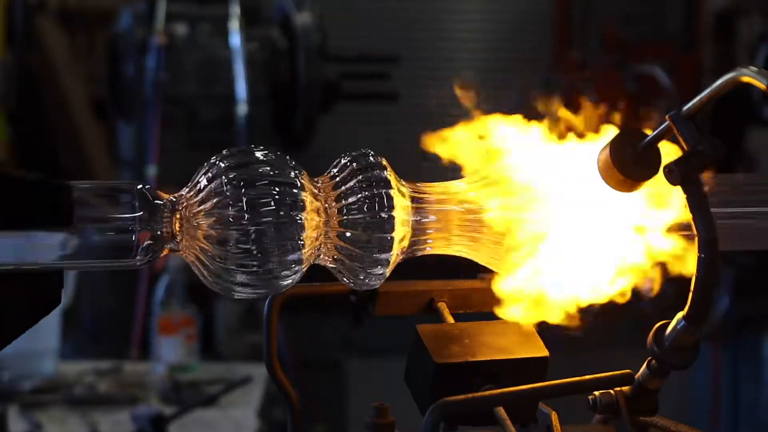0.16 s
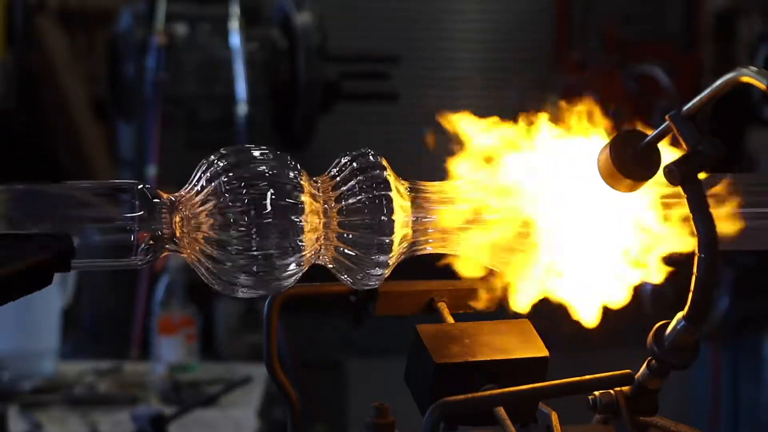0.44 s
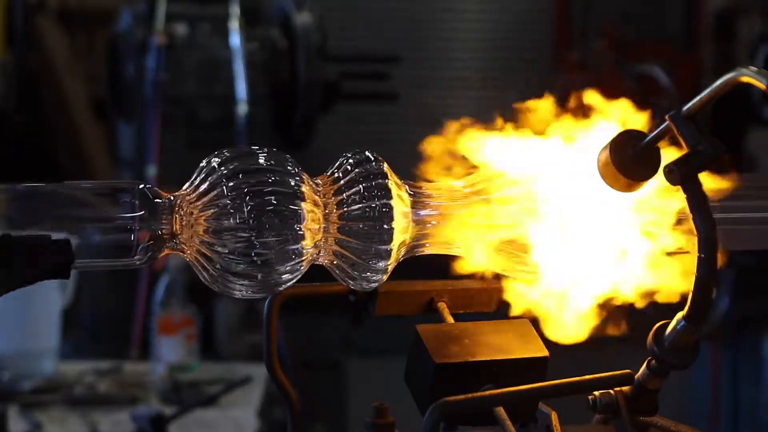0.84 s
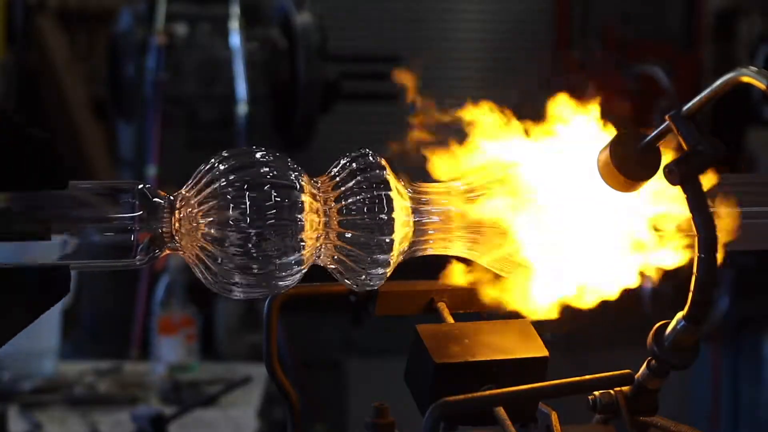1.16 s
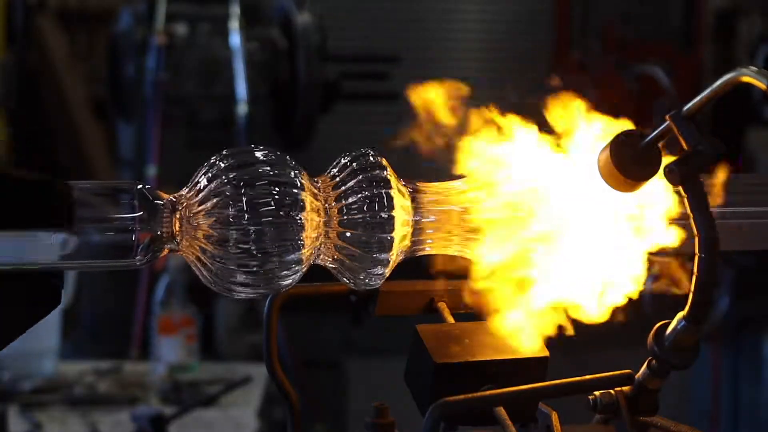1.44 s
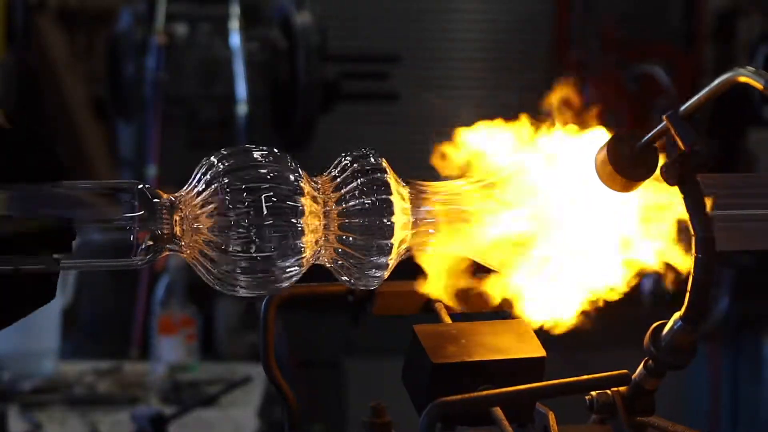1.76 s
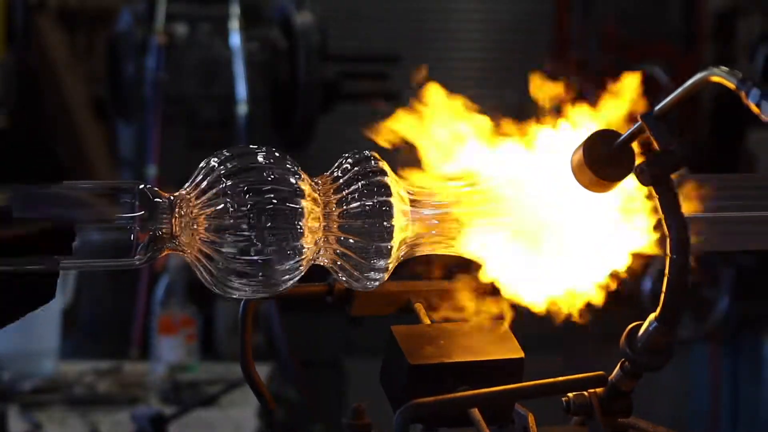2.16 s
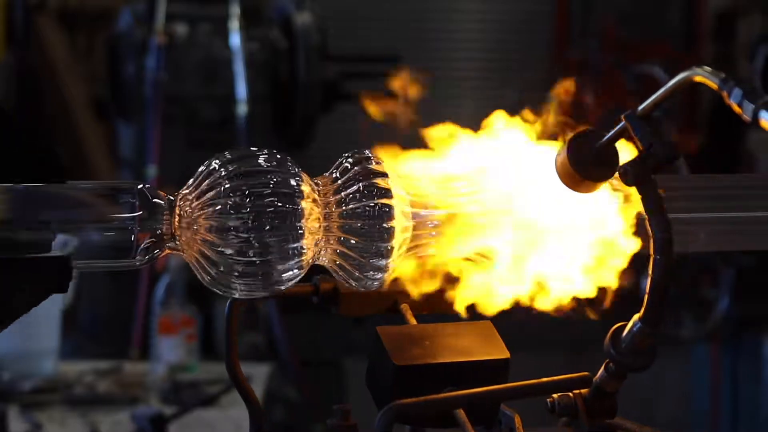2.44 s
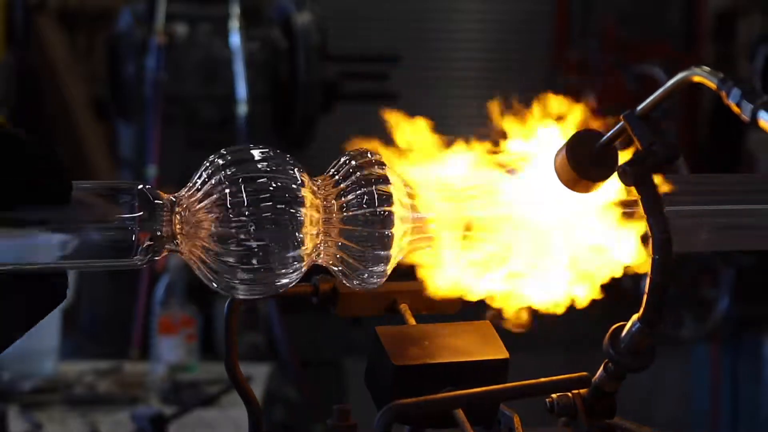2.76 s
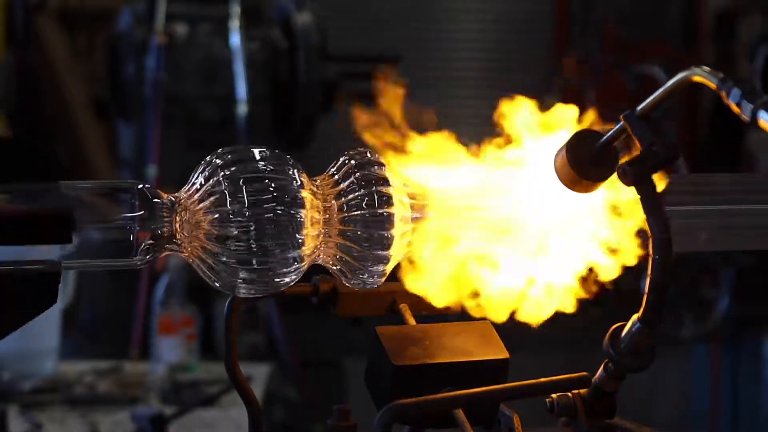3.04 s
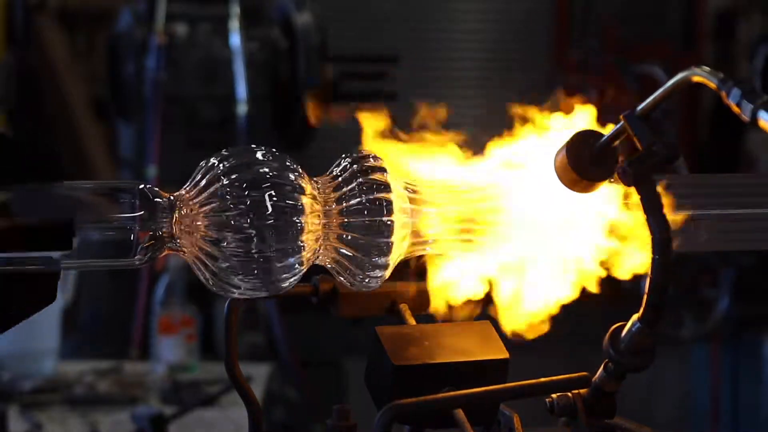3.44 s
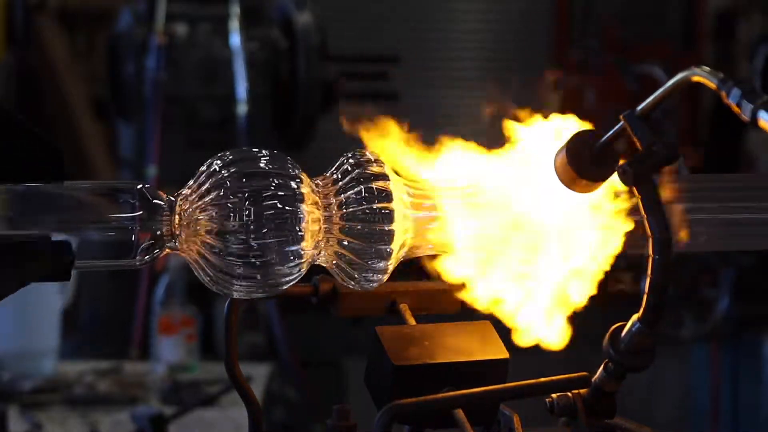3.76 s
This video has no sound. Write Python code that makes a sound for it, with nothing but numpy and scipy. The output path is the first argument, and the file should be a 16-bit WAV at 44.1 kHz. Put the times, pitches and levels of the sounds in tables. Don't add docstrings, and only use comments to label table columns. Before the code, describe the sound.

From 0 to about 3.9 seconds a gas torch roars loudly and almost evenly, already running and never stopping. Strong bright hiss and fine sizzle dominate a softer, slightly fluttering rumble. A piercing thin whistle near 10.5 kHz quivers in short uneven swells, strongest around 0.2, 2.1 and 2.4 seconds, choking briefly between. The hiss dulls slightly near 2.9 seconds. Close, centred, short workshop echo.

```python
import sys
import numpy as np
from scipy import signal
from scipy.fft import rfft, irfft, next_fast_len
from scipy.io import wavfile
from scipy.ndimage import uniform_filter1d

SR = 44100
rng = np.random.default_rng(int(sys.argv[2]) if len(sys.argv) > 2 else 0)


def ratio(d):
    e = np.asarray(d, float) / 20
    return 10 ** e


def generate_wav(sig):
    pcm = np.round(np.clip(np.atleast_2d(sig).T, -1, 1) * 32767).astype(np.int16)
    wavfile.write(sys.argv[1], SR, pcm)


N = 171549
T = np.arange(next_fast_len(N, True)) / SR
HZ = np.maximum(np.fft.rfftfreq(len(T), 1 / SR), 1)
PATCH_S = 0.04


def noise():
    return rfft(rng.standard_normal(len(T)))


def wave(spectrum):
    return irfft(spectrum, len(T))


def level(x, db):
    return x * ratio(db) / np.sqrt(np.mean(x ** 2))


def walk(rate):
    hold = int(SR / rate)
    steps = np.repeat(rng.standard_normal(400), hold)[:len(T)]
    slewed = uniform_filter1d(uniform_filter1d(steps, hold), hold)
    return (slewed - slewed.mean()) / slewed.std()


def turbulence(points, billow_db, flicker_db, billow_hz, edge_db):
    hz, db = np.array(points).T
    octaves = np.log2(HZ)
    low, high = np.log2(hz[0]), np.log2(hz[-1])
    outside = np.maximum(low - octaves, 0) + np.maximum(octaves - high, 0)
    colour = noise() * ratio(np.interp(octaves, np.log2(hz), db) - edge_db * outside)
    billow = billow_db * walk(billow_hz)
    out = 0
    for centre in np.arange(low // 1 - 1, min(high + 1, 14.6), 0.5):
        share = np.cos(np.pi * np.clip(octaves - centre, -0.5, 0.5)) ** 2
        flicker = flicker_db * walk(billow_hz * 3)
        out = out + wave(colour * share) * ratio(billow + flicker)
    return out


def combustion():
    # [Hz, dB per Hz]
    flame_colour = [(15, -59), (25, -31), (181, 1.5), (284, -2), (381, 2), (672, -4.5), (1440, -3.5),
                    (2310, -4), (2700, -24), (3510, -26), (5940, -120)]
    return level(turbulence(flame_colour, billow_db=0.47, flicker_db=0.54, billow_hz=6, edge_db=60), -31.5)


def gas_jets():
    # [Hz, dB per Hz]
    jet_colour = [(2600, -14.5), (3600, -10), (5860, -5), (7530, -5.5), (8900, -3.5), (9300, -7.5),
                  (10300, -9.5), (11300, -15)]
    return level(turbulence(jet_colour, billow_db=0.62, flicker_db=0.41, billow_hz=5, edge_db=76), -21.5)


def nozzle_rim():
    # [Hz, dB per Hz]
    rim_colour = [(11300, 3.5), (12500, 3.5), (13400, 0.5), (14000, 2), (14600, -0.5), (15700, -6)]
    return level(turbulence(rim_colour, billow_db=0.25, flicker_db=0.3, billow_hz=7, edge_db=300), -28)


def torch():
    # [Hz, Hz, dB]
    resonances = [(185, 78, -2), (445, 340, 1.5), (1000, 150, 2.5), (2700, 260, -2), (2410, 264, 6),
                  (3190, 350, 3), (3950, 380, 1.5), (3540, 170, -2.5), (6000, 580, 4), (7160, 87, 2),
                  (7340, 120, -0.5), (8100, 300, 0.5), (8830, 420, 2.5), (12350, 600, 3)]
    # [s, 0-1]
    aim_points = [
        (0, 0.3),
        (.5, 1),
        (1.7, 0.77),
        (2.3, 0.93),
        (2.9, 0.16),
        (3.89, 0.35),
    ]
    # [s, dB]
    flow_points = [(0, 0), (.6, -0.5), (1.2, 0), (1.8, -.5), (2.4, -1), (3.0, -1), (3.5, -0.5), (3.89, -1)]
    spectrum = rfft(combustion() + gas_jets() + nozzle_rim())
    lift_db = sum(db / (1 + (2 * (HZ - hz) / width) ** 2) for hz, width, db in resonances)
    aim = np.clip(np.interp(T, *np.array(aim_points).T), 0, 1)
    facing = wave(spectrum * ratio(lift_db))
    averted = wave(spectrum * ratio(lift_db * (HZ < 5000)))
    heard = aim * facing + (1 - aim) * averted
    return heard * ratio(np.interp(T, *np.array(flow_points).T))


def whistle():
    # [s, dB, s]
    swells = [(.165,-15,0.034), (0.256,-19.5,0.026), (.335,-16,0.035), (.44,-16,0.027), (.52,-21,0.031),
              (0.572,-19.5,0.032), (0.792,-18,0.028), (0.88,-17.5,0.053), (1.13,-20.5,.09),
              (1.24,-19.5,0.09), (1.388,-17,0.056), (1.527,-20,.11), (1.702,-30,0.062), (1.86,-26,.05),
              (2.138,-14.5,0.077), (2.372,-14.5,0.065), (2.472,-17.5,0.1), (2.63,-22,.07),
              (2.774,-22,0.086), (2.833,-18,0.04), (2.908,-17.5,0.092), (2.965,-28,0.12), (3.043,-22,.05),
              (3.27,-19,0.13), (3.44,-21.5,0.079), (3.528,-22,0.066), (3.594,-17,0.035),
              (3.693,-17.5,0.058), (3.782,-17,0.062), (3.875,-18.5,0.056)]
    chokes = [.09, .2, .56, .63, .68, .71, .85, .93, .98, 1.07, 1.19, 1.445, 1.62, 1.8, 1.88, 1.98, 2.02,
              2.21, 2.575, 2.72, 3.0, 3.085, 3.115, 3.145, 3.35]
    # [Hz, Hz, dB]
    skirt = [
        (10525, 55, -33.5),
        (10480, 120, -38),
        (10640, 250, -41),
    ]
    rest_db, choke_s = -24.5, 0.0077
    power = ratio(rest_db) ** 2
    for s, db, length in swells:
        power = power + ratio(db) ** 2 * 2.0 ** -((3.2 * (T - s) / length) ** 2)
    hz = 10541 + 1.5 * walk(8) + 7 * walk(60)
    tone = np.sqrt(2 * power) * np.sin(2 * np.pi * np.cumsum(hz) / SR)
    tone = tone * ratio(1.2 * walk(65))
    for s in chokes:
        tone = tone * (1 - np.exp(-((T - s) / choke_s) ** 2))
    breath = sum(level(wave(noise() / (1 + (2 * (HZ - f) / w) ** 2)), db) for f, w, db in skirt)
    return tone + breath


def workshop(x):
    # [s, dB, +1 or -1]
    reflections = [(.00101, -25, 1), (.00239, -32, -1), (.0065, -31, -1), (.01193, -29, -1),
                   (.0122, -26, 1), (.01226, -24, -1), (.01255, -30, 1), (.0374, -31, -1),
                   (.04037, -31, -1)]
    t60_s, room_db, thin_below_hz = 0.46, -8, 1510
    response = 1 + sum(sign * ratio(db) * np.exp(-2j * np.pi * HZ * s) for s, db, sign in reflections)
    tail = rng.standard_normal(len(T)) * ratio(-60 * T / t60_s) * np.clip(T / 0.012, 0, 1)
    tail = rfft(tail / np.sqrt(np.sum(tail ** 2))) / np.sqrt(1 + (thin_below_hz / HZ) ** 2)
    return wave(rfft(x) * (response + tail * ratio(room_db)))


def building():
    return level(wave(noise() / (1 + (HZ / 30) ** 2)), -72)


def parted_bands(mono):
    # [s, Hz, Hz]
    patches = [(.058, 8250, 10350), (.29, 8250, 9700), (.29, 11700, 13100), (.29, 14450, 15700),
               (.405, 11000, 12400), (1.15, 11000, 12400), (2.45, 11700, 13100), (2.495, 13100, 14450),
               (2.52, 8950, 10350), (2.615, 4750, 6250), (2.75, 11000, 12400), (2.75, 13100, 15200),
               (2.845, 13800, 15700), (2.96, 6200, 7600), (2.96, 8950, 10350), (2.96, 13800, 15700),
               (3.26, 14450, 15700)]
    patch_gain = ratio(-3)
    same, other = rfft(mono, len(T)), rfft(mono[::-1], len(T))
    change = np.zeros((2, N))
    for s, low_hz, high_hz in patches:
        band = (HZ > low_hz) & (HZ < high_hz)
        gate = np.cos(np.pi * np.clip((T[:N] - s) / PATCH_S, -0.5, 0.5))
        change += gate * patch_gain * wave(other * band)[:N] * np.array([[1], [-1]])
        change -= gate ** 2 * (1 - patch_gain) * wave(same * band)[:N]
    return change


def starved_hiss(mono):
    starved = [2.158, 2.375, 3.78]
    # [Hz, Hz]
    starved_band = (10750, 12300)
    beside = wave(rfft(mono, len(T)) * (HZ > starved_band[0]) * (HZ < starved_band[1]))[:N]
    dips = sum(np.exp(-(3 * (T[:N] - s) / PATCH_S) ** 2) for s in starved)
    return (1 - ratio(-11)) * beside * dips


def scene():
    return np.tile((workshop(torch()) + whistle() + building())[:N], (2, 1))


def low_pass(x):
    return signal.sosfilt(signal.butter(12, 16180, fs=SR, output="sos"), x)


def record(dry):
    out = dry + parted_bands(dry[0]) - starved_hiss(dry[0])
    out = wave(rfft(out, len(T)) * (HZ < 15770))[:, :N]
    return low_pass(out)


dry = scene()
out = record(dry)
generate_wav(out)
```